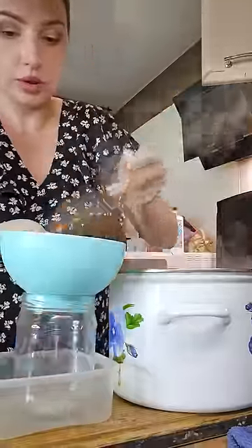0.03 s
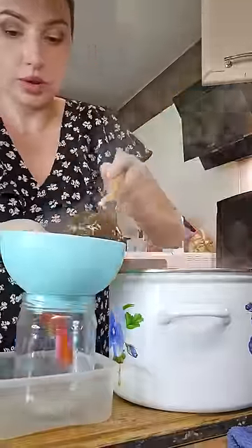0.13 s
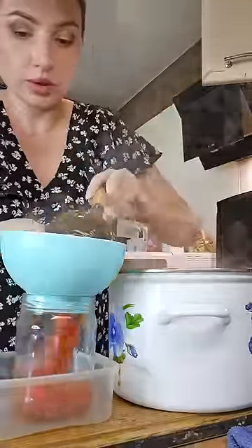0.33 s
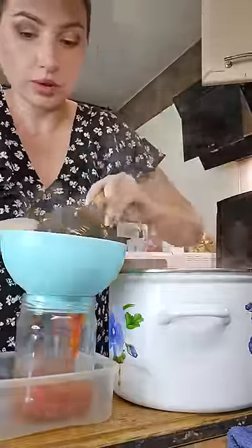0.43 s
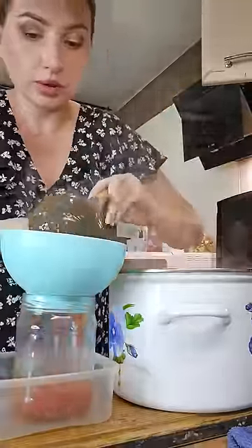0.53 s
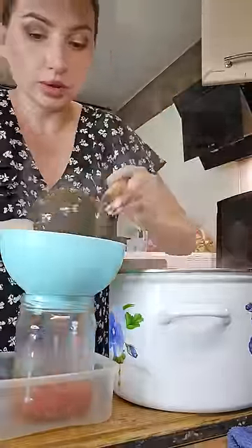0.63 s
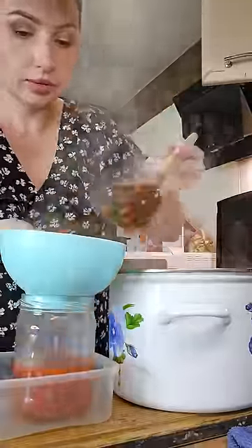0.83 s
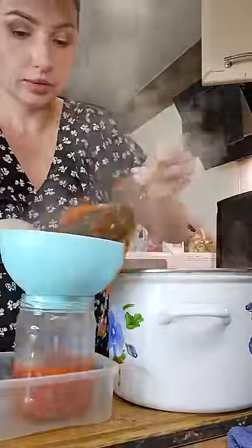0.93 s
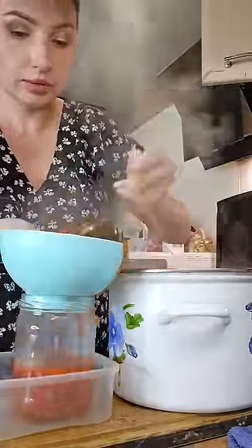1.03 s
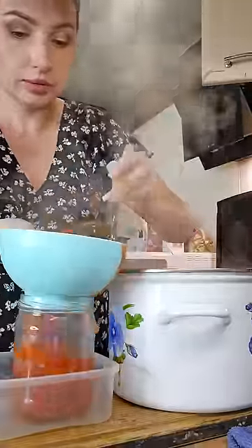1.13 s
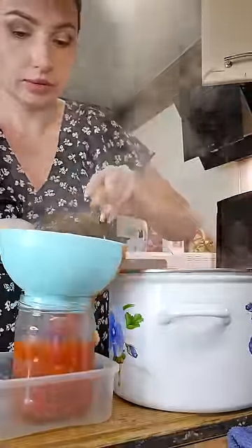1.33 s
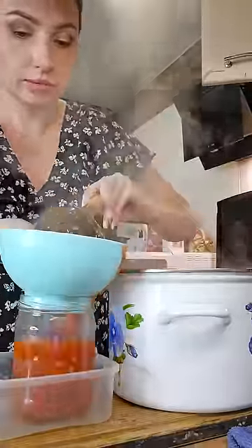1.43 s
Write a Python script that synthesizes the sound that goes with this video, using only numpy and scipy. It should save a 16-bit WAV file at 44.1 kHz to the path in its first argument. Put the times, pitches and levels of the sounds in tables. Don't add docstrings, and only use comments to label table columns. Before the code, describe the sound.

Thick sauce slides through a plastic funnel into a glass jar: wet snaps, ladle taps, one hollow ringing plop, a sparse lull, then a denser burst of plops and splats; close stereo microphone, small kitchen, low hum.

```python
import sys
import numpy as np
from scipy import signal
from scipy.fft import rfft, irfft, next_fast_len
from scipy.io import wavfile

SR = 44100
rng = np.random.default_rng(int(sys.argv[2]) if len(sys.argv) > 2 else 0)


def generate_wav(signal):
    frames = np.transpose(np.atleast_2d(signal))
    scaled = np.clip(frames, -1, 1) * 32767
    pcm = np.round(scaled).astype(np.int16)
    wavfile.write(sys.argv[1], SR, pcm)


def voltage_ratio(level):
    return 10 ** (np.asarray(level, float) / 20)


N = 66150

# f/Hz, level/dB
PORT_DIFFERENCE = [(500, -0.5), (2500, -3), (4300, -1), (6000, -15), (8000, 3.5), (11000, -1), (14000, 0)]
PORT_SIGN = np.array([[1], [-1]])


def rms_one(x):
    return x / np.sqrt(np.mean(x ** 2) + 1e-20)


def in_time(rows):
    return np.interp(np.arange(N) / SR, *np.transpose(rows))


def at_hz(points, hz):
    p = np.array(points, float)
    return np.interp(np.log(hz + 1), np.log(p[:, 0] + 1), p[:, 1])


def ring(x, hz, t60_s):
    r = voltage_ratio(-60 / (t60_s * SR))
    w = 2 * np.pi * hz / SR
    return signal.lfilter([0, np.sin(w)], [1, -2 * r * np.cos(w), r * r], x + 1e-18)


def add(out, x, t_s):
    i = int(t_s * SR)
    out[..., i:i + x.shape[-1]] += x[..., :N - i]


def colour(x, points):
    hz = np.fft.rfftfreq(x.shape[-1], 1 / SR)
    return irfft(rfft(x) * voltage_ratio(at_hz(points, hz)), x.shape[-1])


def rattle(t, length_s):
    common, apart, uneven = rng.standard_normal((3, len(t)))
    u = t / max(length_s, 5e-4)
    envelope = u ** 0.5 * np.exp(-u ** 2)
    burst = (common + 0.39 * apart * PORT_SIGN) * np.abs(uneven) * envelope
    return burst / np.sqrt(np.sum(burst ** 2))


def hum():
    # t/s, level/dB
    hum_level = [(0, -28.5), (.36, -33.5), (.9, -34), (1.09, -31), (1.5, -33.5)]
    # f/Hz, level/dB
    hum_colour = [(15, -29), (25, -14), (92, 1), (463, -3), (591, -1.5), (659, -6.5), (796, -19),
                  (4140, -28.5), (16000, -72)]
    # f/Hz, width/Hz, level/dB
    hum_peaks = [(58.4, 7.9, 7.8), (155.4, 18.8, 11.2), (275.6, 10, 6.1), (461, 23, 4.3), (620, 21, 7.6),
                 (772, 65, 8.6)]
    # f/Hz, correlation/1
    likeness = [(60, .98), (180, .995), (400, .93), (800, .75), (1400, -.1), (15000, 0)]
    hz = np.fft.rfftfreq(N, 1 / SR)
    db = at_hz(hum_colour, hz)
    for f, width, peak_db in hum_peaks:
        db = db + peak_db / (1 + (2 * (hz - f) / width) ** 2)
    mid, side = rfft(rng.standard_normal((2, N))) * voltage_ratio(db)
    alike = np.clip(at_hz(likeness, hz), -1, 1)
    pair = np.sqrt(1 + alike) * mid + np.sqrt(1 - alike) * side * PORT_SIGN
    pair = pair * voltage_ratio(at_hz(PORT_DIFFERENCE, hz) / 2 * PORT_SIGN)
    return voltage_ratio(in_time(hum_level) - 0.5) * rms_one(irfft(pair, N))


def trickle():
    # t/s, level/dB
    flow = [(0, -63), (.16, -56), (.25, -40.5), (.4, -40), (.47, -56), (.62, -50.5), (.75, -63.5),
            (1.05, -65), (1.15, -42.5), (1.2, -36.5), (1.27, -42.5), (1.36, -58), (1.45, -63), (1.5, -46)]
    # f/Hz, level/dB
    crackle_colour = [(900, -12.5), (2600, -14), (4200, -1), (5800, -7), (7200, -16), (11500, -18),
                      (15500, -19)]
    grains_per_s, spread_db, pitches = 6000, 2.5, 24
    sizes = voltage_ratio(spread_db * np.minimum(rng.exponential(1, N), 5)) * rng.choice([-1, 1], N)
    grains = sizes * (rng.random(N) < grains_per_s / SR)
    dealt = rng.integers(0, pitches, N)
    body = np.zeros(N)
    for k, hz in enumerate(np.geomspace(1100, 15000, num=pitches)):
        body += ring(grains * (dealt == k), hz, 25 / hz) * hz ** 0.5
    return voltage_ratio(in_time(flow)) * rms_one(colour(body, crackle_colour))


def rub():
    # t/s, level/dB
    rub_level = [(0, -43), (.3, -42), (.45, -60.5), (1.09, -56.5), (1.13, -42), (1.2, -50), (1.5, -80)]
    hz, t60_s, level_db = 2000, 0.006, -3
    friction = ring(rng.standard_normal(N), hz, t60_s)
    return voltage_ratio(in_time(rub_level) + level_db) * rms_one(ring(friction, hz, t60_s))


def taps():
    # t/s, peak level/dB, f/Hz, t60/s
    ladle_taps = [(0.191, -28.5, 1539, 0.13), (.271, -15.5, 2050, 0.036), (.279, -23, 1250, 0.06),
                  (0.365, -21.5, 1264, 0.054), (0.367, -19, 2200, 0.007), (.435, -28, 1080, 0.025),
                  (.485, -39.5, 2624, 0.071), (.555, -31, 1566, 0.082), (1.131, -30.5, 1980, 0.051),
                  (1.181, -26, 2500, 0.013), (1.198, -21, 1835, 0.041), (1.24, -21.5, 2730, 0.02),
                  (1.252, -15, 1310, 0.0216), (1.293, -31.5, 2640, 0.036), (1.211, -25, 1390, 0.021),
                  (1.3215, -23, 2080, 0.007), (1.435, -32.5, 1535, 0.18)]
    # t/s, peak level/dB, f/Hz, t60/s
    spatter = [(.081, -36, 983, 0.017), (.229, -23, 3116, 0.041), (.243, -22.5, 3330, 0.025),
               (.281, -22, 2250, .015), (.434, -19.5, 720, 0.022), (1.172, -22, 1910, 0.013),
               (1.19, -26, 3000, .015), (1.197, -23.5, 2400, 0.048), (1.198, -21, 3170, 0.021),
               (1.219, -26, 1360, 0.015), (1.222, -24, 3570, 0.042), (1.226, -26, 2620, .02),
               (1.232, -22, 3370, 0.031), (1.247, -21.5, 3140, 0.022), (1.252, -26.5, 2690, 0.03),
               (1.262, -24.5, 3390, 0.059), (1.322, -26, 1380, 0.022), (1.4226, -28, 3105, 0.033),
               (1.488, -29.5, 3210, 0.041)]
    # f/Hz, level/dB
    ladle_modes = [(1215, -12.5), (2050, -11.5), (2390, -8.5), (2700, -10)]
    contact_s, mode_t60_s, mode_spread_db, level_db = 0.0026, 0.02, 2.0, -9
    out, t = np.zeros((2, N)), np.arange(SR // 5) / SR
    for t_s, db, hz, t60_s in list(ladle_taps) + list(spatter):
        burst = rattle(t, contact_s)
        own = ring(burst, hz, t60_s)
        body = own / np.std(own[:, :SR // 100])
        for mode_hz, mode_db in ladle_modes:
            gain = voltage_ratio(mode_db + rng.normal(0, mode_spread_db))
            body = body + gain * ring(burst, mode_hz, mode_t60_s)
        add(out, voltage_ratio(db + level_db) * body, t_s - 0.001)
    return out


def splats():
    # t/s, peak level/dB, f/Hz, length/s, brightness/dB
    first_splats = [(0.0962, -34.5, 4270, 0.0088, -37), (0.17, -32, 4800, 0.0075, -27),
                    (0.1757, -26.5, 5900, 0.0056, -43), (0.2277, -16, 4370, 0.0026, -29.5),
                    (0.2335, -12, 4540, 0.0026, -41.5), (0.2425, -37, 3630, 0.0042, -21),
                    (0.2705, -24.5, 5540, 0.0056, -18), (0.279, -26, 5620, 0.0041, -18),
                    (0.29, -28, 5300, 0.0045, -9), (0.3107, -18, 5300, 0.0097, -12),
                    (0.317, -16.5, 5300, 0.0078, -25), (0.3252, -3.5, 5570, 0.0024, -23.5),
                    (0.329, -9.5, 5750, 0.0033, -29.5), (0.335, -38, 4380, 0.0023, -23),
                    (0.3646, -14.5, 4430, 0.006, -26), (0.4035, -27, 5970, 0.0053, -15),
                    (0.4345, -28, 3870, 0.006, -19), (0.483, -32, 5720, 0.0054, -3),
                    (0.5495, -30, 5960, 0.003, -13), (0.5535, -11.5, 4290, 0.0035, -4.5),
                    (0.6597, -20, 6010, 0.0036, -13), (0.6935, -37.5, 4370, 0.004, -1),
                    (0.793, -43, 5630, 0.0052, -15.5)]
    # t/s, peak level/dB, f/Hz, length/s, brightness/dB
    second_splats = [(1.054, -41, 5700, 0.0063, -19), (1.084, -36, 4730, 0.0065, -33),
                     (1.0899, -18, 4820, 0.0053, -14), (1.14, -19.5, 5100, 0.0041, -13),
                     (1.1541, -21.5, 5270, 0.0073, -3), (1.1723, -11.5, 6430, 0.0037, -32.5),
                     (1.1795, -18.5, 5630, 0.0017, 3.5), (1.1966, -14.5, 5650, 0.0054, -31),
                     (1.2225, -31, 6250, 0.0055, -22), (1.2462, -17.5, 6100, 0.0022, -28.5),
                     (1.2515, -22, 5600, 0.0049, -26), (1.283, -31, 5040, 0.0042, -3),
                     (1.2945, -21, 5700, 0.0037, -3), (1.3212, -8, 5650, 0.0015, -8.5),
                     (1.3622, -33.5, 5450, 0.0051, 3.5), (1.3967, -29, 6070, 0.0082, -17),
                     (1.4215, -26.5, 3130, 0.0085, -19), (1.4684, -38.5, 4800, 0.0054, -10),
                     (1.4881, -23, 5270, 0.0014, -41)]
    # f/Hz, level/dB
    funnel_modes = [(3900, -19.5), (4350, -6.5), (4900, -20.5), (5400, -4), (5800, -20), (6200, -26),
                    (7100, -45.5)]
    # f/Hz, level/dB
    crack_colour = [(3000, -20.5), (4300, -13.5), (6000, -10.5), (8000, -7.5), (10500, -20), (11800, -11),
                    (13500, -20), (16000, -11.5)]
    funnel_t60_s, own_t60_s, detune, mode_spread_db = 0.008, 0.007, 0.03, 2.4
    level_db, crack_db, spray_db, spray_s = -2.5, 6, -11, 0.02
    onset = SR // 160
    out, t = np.zeros((2, N)), np.arange(SR // 8) / SR
    for t_s, db, hz, length_s, bright_db in list(first_splats) + list(second_splats):
        burst = rattle(t, length_s)
        body = ring(burst, hz, own_t60_s)
        for mode_hz, mode_db in funnel_modes:
            level_draw, pitch_draw = rng.standard_normal(2)
            gain = voltage_ratio(mode_db + mode_spread_db * level_draw)
            body = body + gain * ring(burst, mode_hz * (1 + detune * pitch_draw), funnel_t60_s)
        snap = rattle(t, length_s)
        spray = voltage_ratio(spray_db) * rng.standard_normal((2, len(t)))
        spray = spray * np.exp(-t / spray_s) * np.minimum(t / 0.0009, 1)
        crack = colour(snap / np.std(snap[:, :onset]) + spray, crack_colour)
        splat = body / np.std(body[:, :onset]) / 2 + voltage_ratio(crack_db + bright_db) * crack
        add(out, voltage_ratio(db + level_db) * splat, t_s - 0.001)
    return signal.sosfilt(signal.butter(6, 3520, "high", fs=SR, output="sos"), out)


def plops():
    # t/s, peak level/dB, f/Hz, push length/s
    plop_pushes = [(0.179, -31, 60.5, 0.084), (1.10, -28.5, 160, 0.03), (1.176, -26.5, 315, 0.014),
                   (.279, -24, 537, 0.011), (0.365, -25.5, 606, 0.007), (.4325, -2.5, 541, 0.0095),
                   (0.473, -15, 556.5, 0.013), (0.515, -31, 514, 0.03), (1.174, -15, 630, 0.016),
                   (1.1785, 1.5, 630.5, 0.0065), (1.181, -15.5, 957, 0.0097), (1.187, -15, 780, 0.0063),
                   (1.1916, -10.5, 620, 0.0074), (1.21, -15.5, 620, 0.0038), (1.218, -16.5, 601, 0.02),
                   (1.275, -13, 876, 0.0046), (1.2505, -0.5, 876, 0.00476), (1.2553, -8.5, 800, 0.0055),
                   (1.249, -19, 461, 0.0133)]
    # f/Hz, level/dB, t60/s
    air_modes = [(315, -28.5, 0.15), (453, -12, 0.24), (475.1, 1, 0.085), (533, -3, 0.2), (585.7, -5, 0.12),
                 (612, -7, 0.12), (651, -0.5, 0.047), (819, -3, 0.067), (932, 0.5, 0.032)]
    # t/s, level/dB
    jar_drive = [(0.6, -43), (1.1, -44.5), (1.24, -51)]
    push = np.zeros(N)
    for t_s, db, hz, length_s in plop_pushes:
        t = np.arange(int(length_s * SR)) / SR
        envelope = np.sin(np.pi * t / length_s) ** 1.03
        add(push, voltage_ratio(db) * envelope * np.sin(2 * np.pi * hz * t), t_s)
    drive = push * voltage_ratio(in_time(jar_drive))
    return 0.63 * push + sum(voltage_ratio(db) * ring(drive, hz, t60_s) for hz, db, t60_s in air_modes)


def kitchen(x):
    room_t60_s, room_db, treble_t60_s, treble_db = 0.16, -3.5, 0.064, 3.5
    left_leads_s, bass_lag_share = 0.0004344, 0.61
    size = next_fast_len(N + SR)
    hz, t = np.fft.rfftfreq(size, 1 / SR), np.arange(SR // 2) / SR

    def above(corner_hz, order):
        return 1 / (1 + (corner_hz / (hz + 1)) ** order)

    treble = above(7000, 4)
    tail = rng.standard_normal((2, len(t))) * np.minimum(t / 0.004, 1) / np.sqrt(SR / 60)
    wet = rfft(tail * voltage_ratio(-60 * t / room_t60_s), size) * (1 - treble)
    wet = wet + rfft(tail * voltage_ratio(-60 * t / treble_t60_s), size) * treble * voltage_ratio(treble_db)
    apart = bass_lag_share * above(500, 5) + (1 - bass_lag_share) * above(1600, 6)
    side = PORT_SIGN / 2
    direct = np.exp(2j * np.pi * hz * left_leads_s * side * apart)
    ports = voltage_ratio(side * at_hz(PORT_DIFFERENCE, hz)) * (direct + voltage_ratio(room_db) * wet * above(800, 4))
    return irfft(rfft(x, size) * ports, size)[:, :N]


def scene():
    near = trickle() + rub() + taps() + splats() + plops()
    return hum() + kitchen(near)


def top_cut(x):
    return signal.sosfilt(signal.butter(12, 16730, fs=SR, output="sos"), x)


def record(dry):
    low_pass = signal.cheby2(10, 50, 16800, fs=SR, output="sos")
    mix = signal.sosfilt(low_pass, np.clip(dry, -1, 1))
    return top_cut(mix)


dry = scene()
out = record(dry)
generate_wav(out)
```